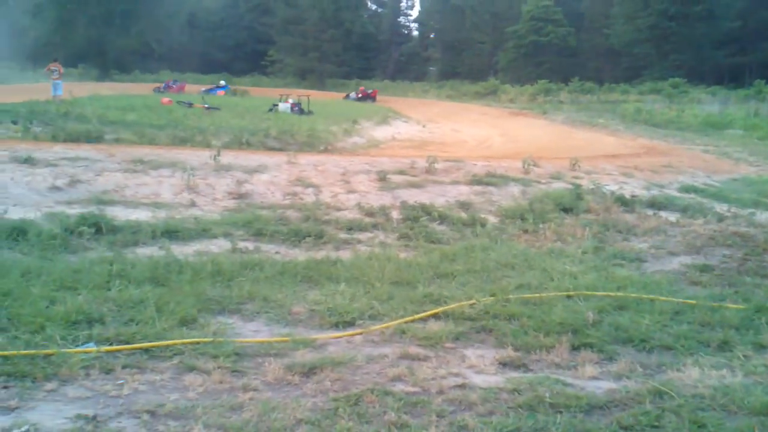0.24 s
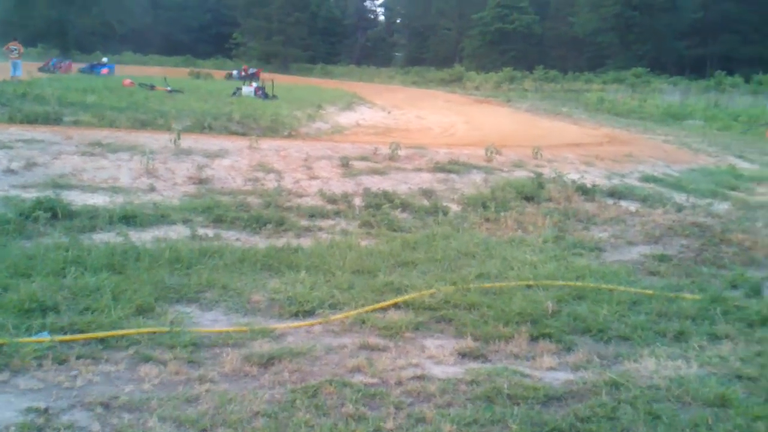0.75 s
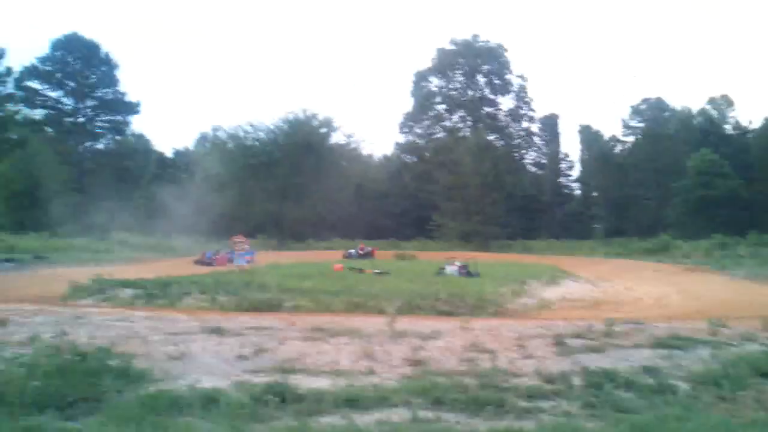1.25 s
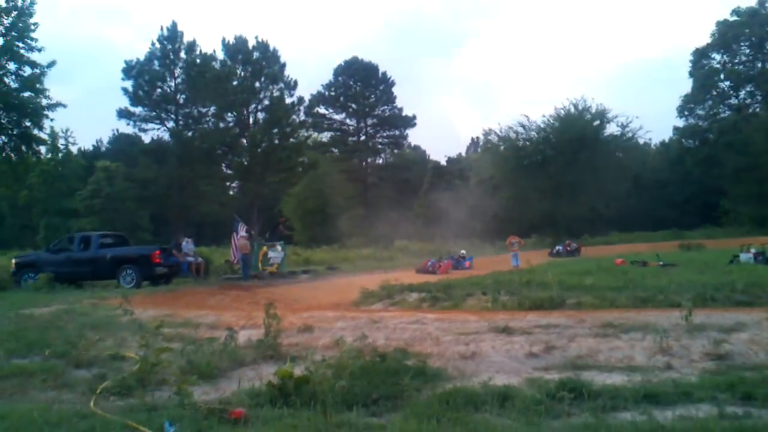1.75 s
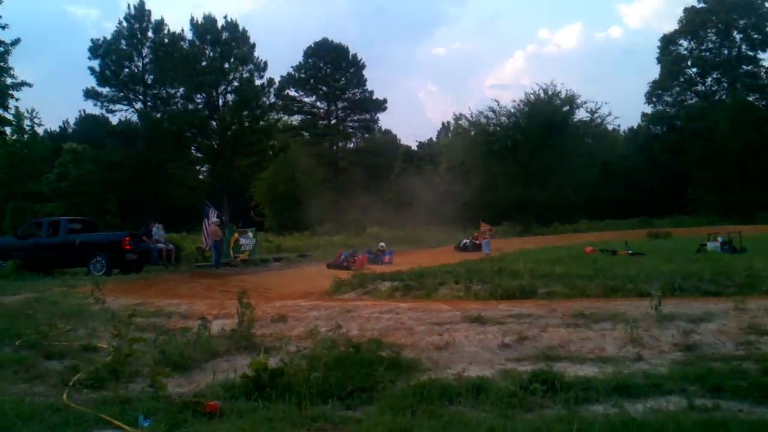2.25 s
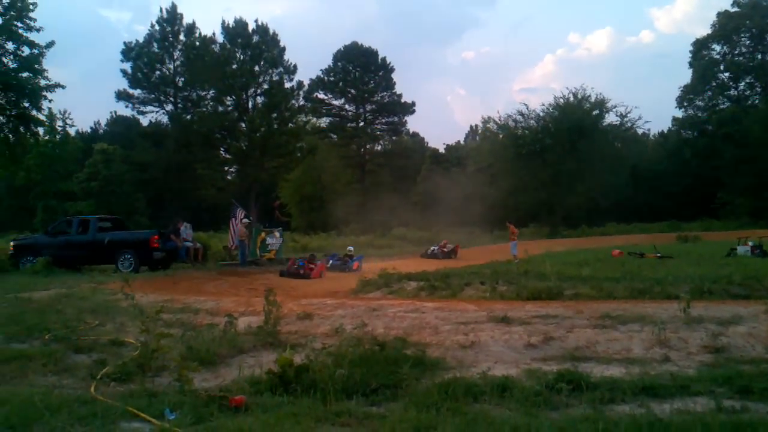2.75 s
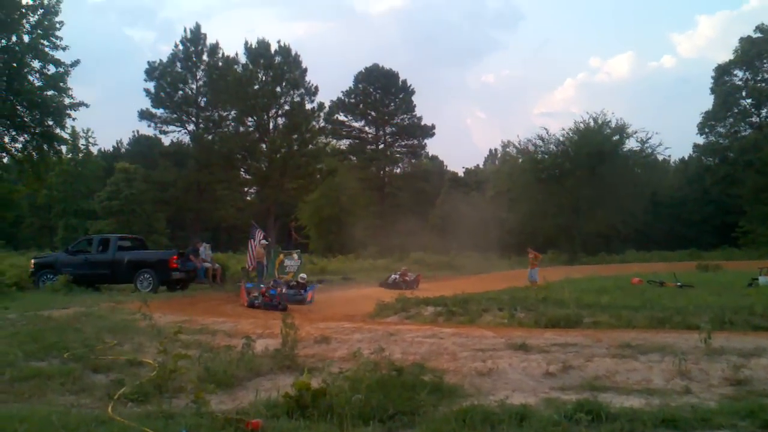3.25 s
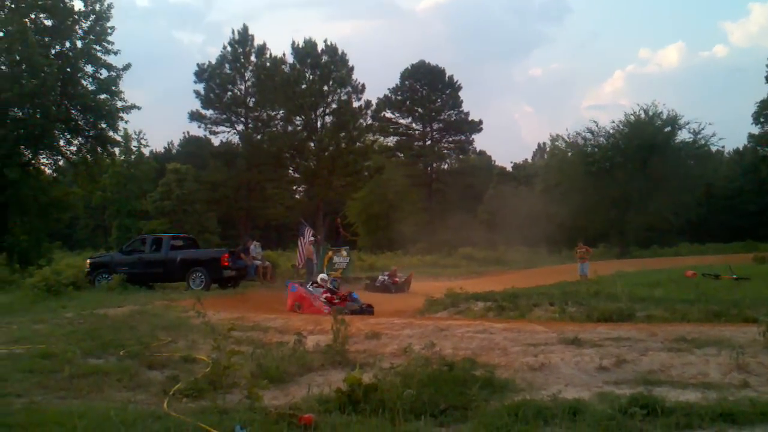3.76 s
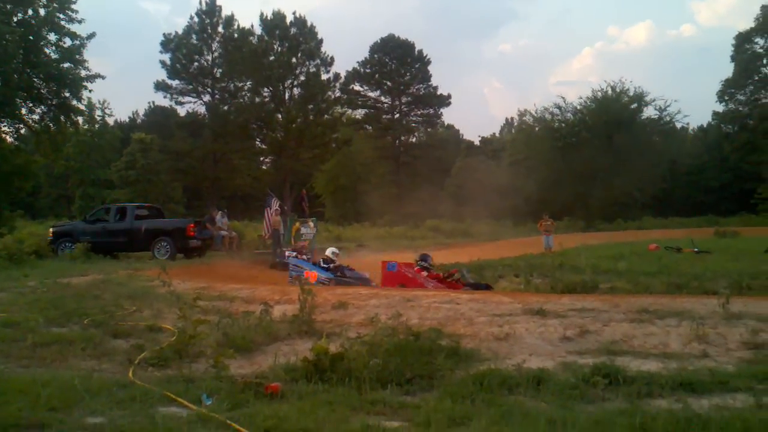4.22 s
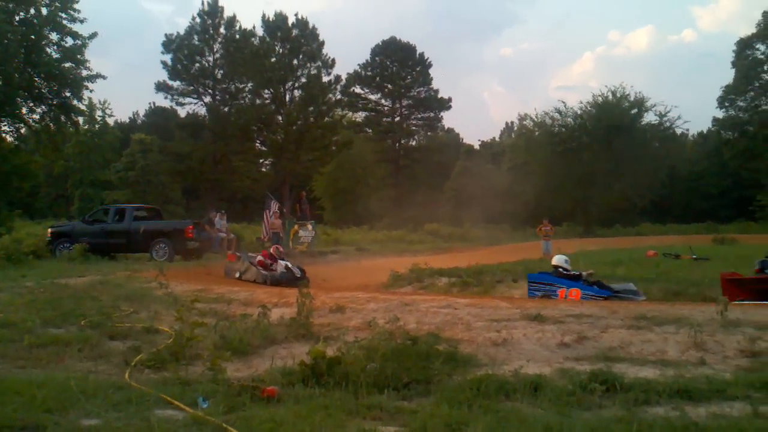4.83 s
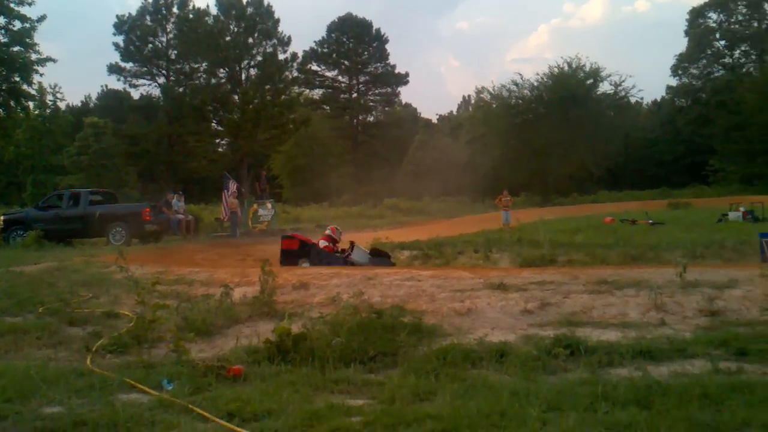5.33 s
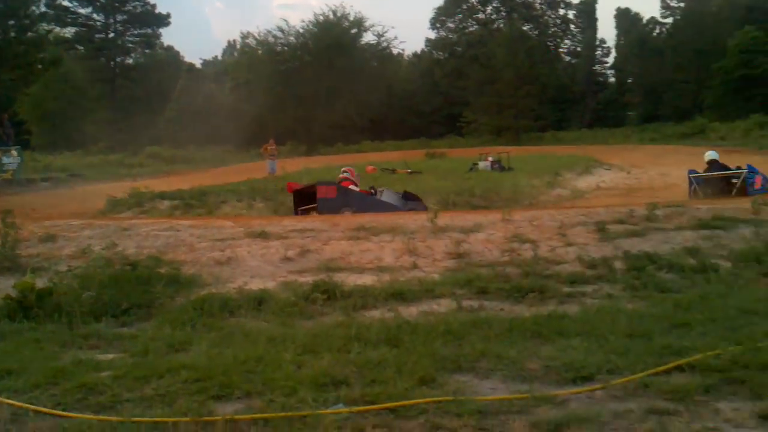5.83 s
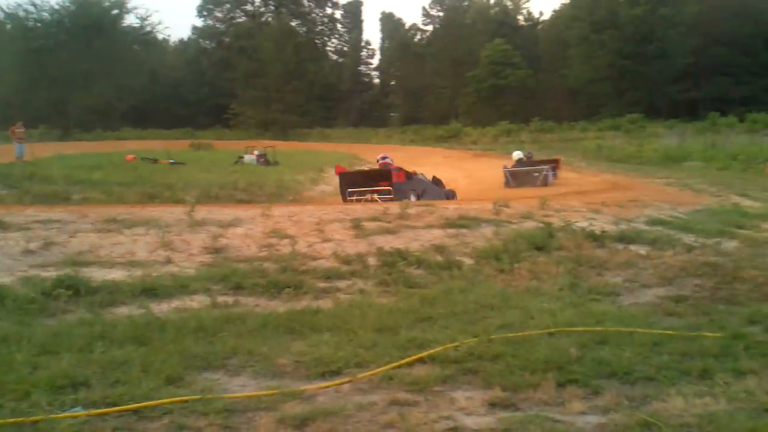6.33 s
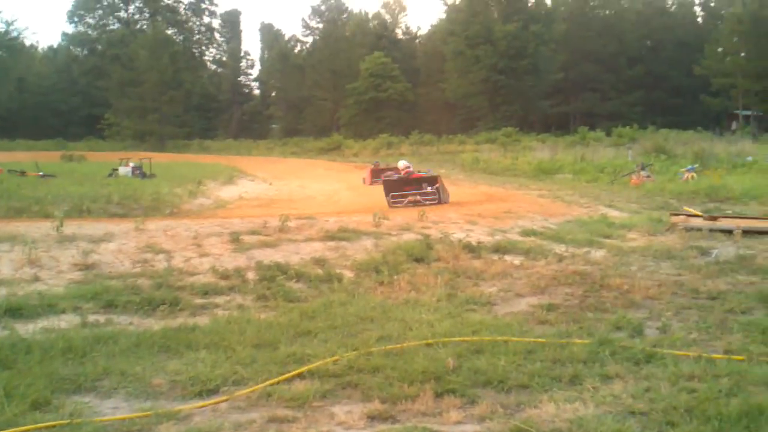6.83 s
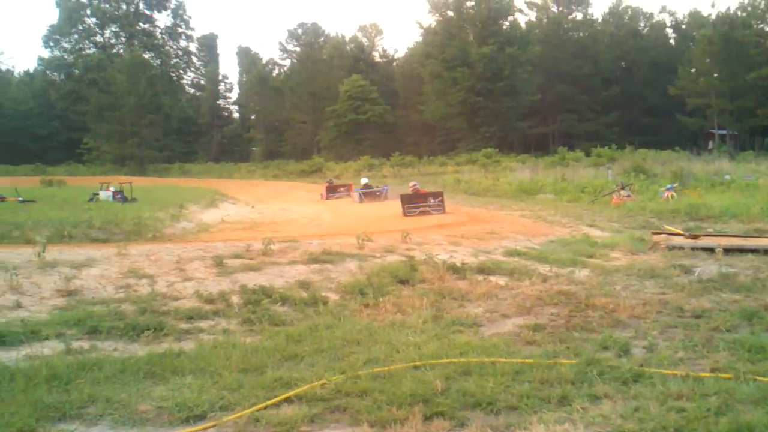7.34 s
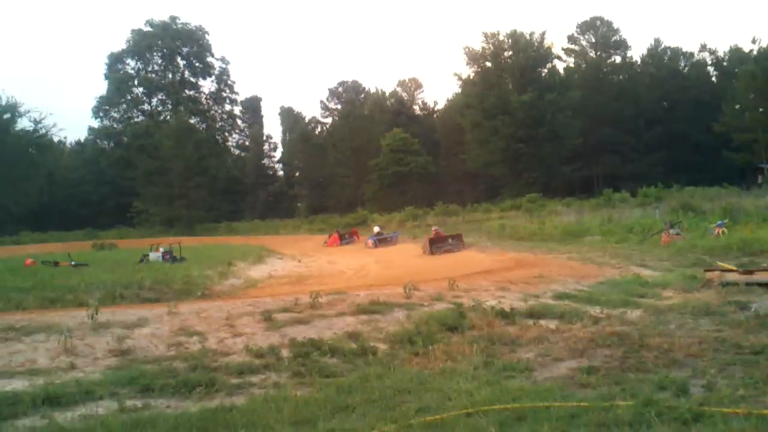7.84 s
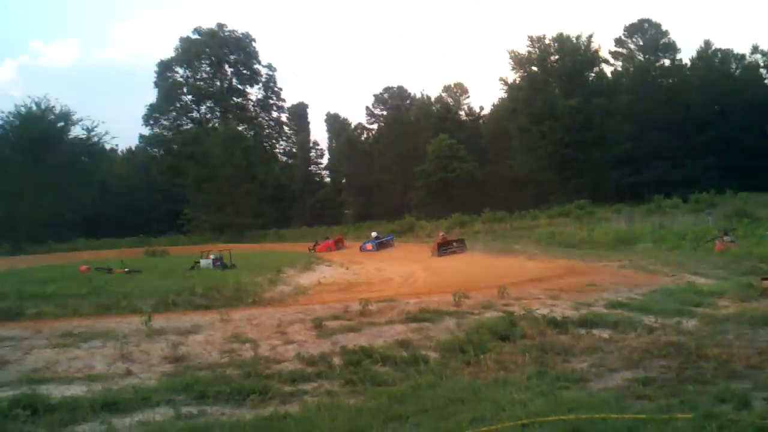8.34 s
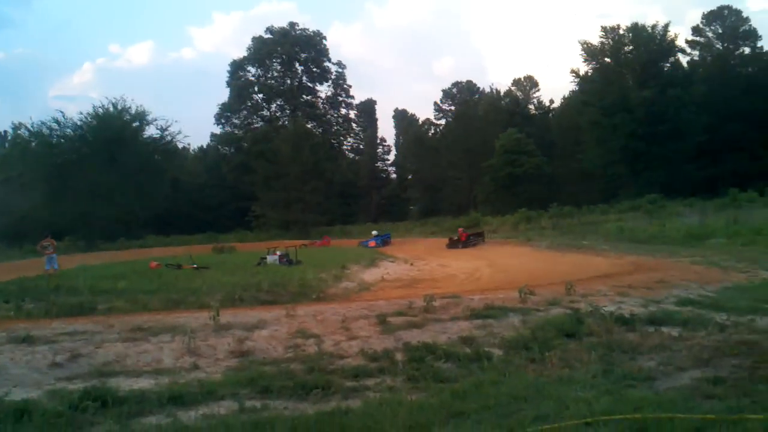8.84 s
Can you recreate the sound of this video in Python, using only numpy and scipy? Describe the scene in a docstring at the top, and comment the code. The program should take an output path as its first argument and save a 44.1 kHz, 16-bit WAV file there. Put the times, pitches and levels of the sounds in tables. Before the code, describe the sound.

Raspy four-stroke karts race by outdoors on packed dirt, low muffled growl and crackling exhaust over hissing tyres, passing close and then receding.

```python
"""Go-karts on a dirt track

Three small four-stroke go-karts lap a dirt track, sweep past a camera and run off into the far turn.
Each firing is a low boom and a bark, with a sharp crack of gas when the pipe points at the camera.
Boom, bark and intake growl are shaped clicks, one per firing; cracks and bangs are short bursts of noise.
Tyres hiss as patchy noise, trees answer with a fading echo, and the camera widens the stereo image."""
import sys
import numpy as np
from scipy import signal
from scipy.fft import rfft, irfft, next_fast_len
from scipy.io import wavfile
from scipy.ndimage import uniform_filter1d, map_coordinates

SR = 44100
rng = np.random.default_rng(int(sys.argv[2]) if len(sys.argv) > 2 else 0)


def store_pcm(level_fs):
    """Save levels as 16-bit WAV."""
    pcm = np.round(np.clip(level_fs, -1, 1) * 32767).astype(np.int16)
    wavfile.write(sys.argv[1], SR, np.atleast_2d(pcm).T)


N = 400428

# All levels are relative: the functions below add trims. Tables with time_s are joined by straight lines.
# Firing rate of each engine, up on the straights and down into the turns: time_s, firings_per_s
FAST_RATE = [(0.0, 46.61), (0.93, 44.12), (1.22, 45.18), (1.69, 43.53), (2.19, 47.53), (3.27, 52.41),
             (4.25, 47.06), (4.79, 45.42), (5.0, 43.8), (5.24, 43.97), (5.6, 42.59), (5.99, 41.7),
             (6.29, 40.34), (6.96, 44.57), (7.79, 48.25), (8.37, 48.9), (9.08, 45.18)]
MIDDLE_RATE = [(0.0, 44.07), (1.06, 37.88), (1.55, 36.63), (3.36, 44.99), (3.75, 44.92), (4.5, 41.66),
               (4.8, 42.48), (5.3, 40.64), (5.75, 37), (6.0, 35.6), (6.24, 34.5), (6.69, 35.75),
               (7.25, 35.3), (7.49, 37.2), (8.25, 41.53), (8.5, 41.87), (8.75, 43.83), (9.08, 44.16)]
SLOW_RATE = [(0, 28.29), (.85, 27.61), (1.1, 28.61), (1.35, 30), (1.75, 29.2), (2.3, 32.6), (2.9, 35.6),
             (3.35, 36.9), (3.7, 33.21), (4, 31.02), (4.4, 30.79), (4.8, 29.73), (5.5, 27.79),
             (5.95, 25.99), (6.55, 26.11), (7, 28.41), (7.5, 30.95), (8.1, 33.97), (8.45, 35), (9.08, 34.6)]
# Exhaust loudness as each kart nears and turns its pipe: time_s, boom_db, bark_db
FAST_LEVEL = [(0, -54, -68), (.8, -51, -54), (1.6, -48, -44), (2.4, -36, -45), (3.15, -44, -31),
              (3.65, -39.5, -37.5), (4.15, -32, -36), (4.52, -27.5, -26.5), (4.72, -33.5, -34),
              (5.05, -33, -30.5), (5.4, -35.5, -30.5), (6, -34.5, -29.5), (6.7, -43.5, -36),
              (7.6, -49, -31.5), (8.45, -38.5, -38), (9.08, -50, -49)]
MIDDLE_LEVEL = [(0, -41, -41), (.42, -49, -47), (.62, -58, -62), (1.5, -45, -58), (2.4, -40, -53),
                (3, -37, -40), (3.7, -60, -51), (4.5, -46, -41), (5.05, -60, -57), (5.9, -36, -36),
                (6.5, -33, -30.5), (7.1, -37.5, -27.5), (7.55, -35.5, -27), (7.95, -33.5, -30.5),
                (8.3, -35.5, -31.5), (8.67, -34.5, -28), (9.08, -34.5, -36.5)]
# The slow kart's exhaust loudness: time_s, boom_db
SLOW_LEVEL = [(0, -48), (.55, -42), (1.5, -40.5), (2.4, -36.5), (3.1, -27.5), (3.42, -33), (3.65, -42.5),
              (4.4, -32.5), (5.05, -45.5), (5.6, -39.5), (6.3, -41), (8.3, -43), (9.08, -49)]
# Tone colours of the three mufflers, the bark and the gas jet: pitch_hz, level_db
FAST_MUFFLER = [(50, -31.5), (95, -23), (140, -11), (190, -9), (280, 0.9), (355, -6), (420, 0), (510, -8.5),
                (610, -8.5), (800, -14.5), (1300, -34.5)]
MIDDLE_MUFFLER = [(50, -38), (100, -30), (140, -8), (215, 1), (270, -1.5), (320, 2.5), (400, 2),
                  (500, -1.5), (600, -10), (1300, -25.5)]
SLOW_MUFFLER = [(50, -55), (100, -14), (140, -0.5), (210, 7), (270, -5.5), (335, 3), (430, -12.5),
                (640, -15), (800, -18), (1300, -40.5)]
BARK_COLOUR = [(150, -13.5), (450, -2), (680, 1), (880, -1), (1170, -8.5), (1450, -2.5), (1900, -8.5),
               (2500, -20.5), (4000, -26.5), (9000, -51)]
JET_COLOUR = [(1200, -9), (2500, -0.5), (3500, 3.5), (5200, 1.5), (6600, 15), (7900, 11.5), (9300, 17.5),
              (10600, 4.5), (11900, 13.5), (12900, 13.5), (13800, 12.5)]
# Times when a pipe points at the camera: kart, start_s, length_s, level_db, dullness (0 near to 1 far)
CRACKS = [("middle", 0, 0.12, -35.5, 0.59), ("middle", 0.24, 0.21, -38.5, 0.72),
          ("fast", 3.444, 0.13, -26, 0), ("fast", 3.68, 0.098, -30, 0.09), ("fast", 4.58, 0.1, -21.5, 0),
          ("fast", 4.82, .1, -25.5, 0.15), ("fast", 4.935, 0.2, -19.5, 0.084),
          ("fast", 5.84, 0.095, -20, 0.045), ("fast", 6.125, 0.046, -17.5, 0.16),
          ("middle", 6.43, 0.46, -30, 0.15), ("middle", 6.945, 0.17, -28, 0.15),
          ("middle", 7.17, 0.081, -30, .2), ("fast", 7.82, 0.21, -25.5, 0.53)]
CRACK_RISE_DB_PER_S, CRACK_FALL_DB_PER_S = 94, 93
CRACK_UNDER_BARK_DB = -14  # the faint crack left when the pipe points away
FAR_HZ = 4430  # distance dulls the crack above this
JET_PEAK_HZ, JET_STRAY_OCTAVES = 8330, 0.46  # brightest band of the cracks, and how far each one strays
# Echoes off the ground and the nearest bank: delay_s, level_db
BANKS = [(.0035, -8.5), (.008, -12)]
BANK_DRIFT_S = .0007  # typical wander of these delays as a kart moves
# Wash of all karts together: time_s, roar_db, dirt_db
WASH_LEVEL = [(0, -38, -40.5), (.7, -47, -40), (1.4, -41, -41), (2.4, -32, -36.5), (3.1, -25.5, -30),
              (3.38, -27, -30), (3.62, -33.5, -36), (4.1, -30.5, -34.5), (4.45, -30.5, -32.5),
              (5, -34, -32.5), (5.4, -33.5, -34), (6.03, -33, -30.5), (6.45, -40, -38.5), (7.1, -41, -38),
              (7.4, -39, -36), (7.85, -33, -32), (8.45, -31.5, -33.5), (9.08, -37, -35)]
# Tone colours of the engine drone, engine roar, dirt and dust: pitch_hz, level_db
DRONE_COLOUR = [(25, -43), (55, -34), (100, -9.5), (190, -0.5), (320, -0.5), (480, -9.5), (900, -31.5)]
ROAR_COLOUR = [(300, -25.5), (520, 3.5), (700, 0.5), (950, -2.5), (1170, -7), (1450, -9), (2000, -9),
               (2600, -23), (4500, -45)]
DIRT_COLOUR = [(1500, -10), (2200, 1), (2600, -11), (3100, 2), (3600, -2.5), (5200, -2.5), (6500, -3),
               (8200, 2.5), (9500, -1.5), (11000, -4.5), (14000, -10)]
DUST_COLOUR = [(8000, -15), (10300, 4.5), (11800, -4), (13700, 2.5)]
DRONE_DB, DRONE_FOLLOWS = -34.5, 0.7  # mean level; swing in dB per dB of the slow kart's boom
# Finest hiss, strongest as karts throw dust toward the camera: time_s, level_db
DUST_LEVEL = [(0, -44), (.9, -44), (1.13, -41), (1.45, -52), (2.75, -40), (3.4, -29), (3.9, -40),
              (4.3, -36), (4.6, -29), (5.05, -32), (5.45, -37), (6.05, -27), (6.4, -39), (7.3, -40),
              (7.6, -32), (8, -29.5), (8.3, -33), (8.7, -35), (9.08, -39)]
# Short showers of dirt flung up by tyres: time_s, extra_level_db (0 adds nothing)
SHOWERS = [(1.13, 0.5), (3.43, 0), (6.04, 0), (8.35, 4)]
SHOWER_S = 0.029  # how long a shower takes to swell and to sink
# Emphasised bands, shifting as karts turn and change distance; the first two shape everything: time_s, pitch_hz
BOOM_PEAK = [(0, 280), (.9, 230), (2.2, 278), (3.1, 342), (3.5, 310), (4, 283), (4.6, 267), (5.3, 213),
             (6.7, 210), (7.6, 229.9), (8.6, 310), (9.08, 260)]
BARK_PEAK = [(0, 730), (2.5, 660), (3.1, 720), (3.5, 784), (3.8, 620), (4.2, 750), (4.65, 700), (4.9, 830),
             (6.4, 700), (7.3, 810), (7.8, 860), (8.45, 780), (8.65, 942), (9.08, 880)]
DIRT_PEAK = [(0, 9200), (1.8, 8400), (3.3, 8600), (4.3, 8600), (5.1, 6940), (6, 7900), (7.6, 9500),
             (8.25, 9700), (8.45, 7800), (9.08, 8500)]
# How long the echo from the trees takes to fade by 60 dB: pitch_hz, fade_s
TREE_FADE = [(150, 0.55), (1000, 0.13), (4000, 0.27), (12000, 0.034)]
# Single firings that bang much harder than their neighbours: time_s, level_db
BANGS = [(0.018, -29), (0.042, -26), (0.247, -27), (0.3658, -27), (0.511, -26), (.608, -31), (3.564, -28),
         (4.6495, -19), (4.8215, -17), (4.8668, -15.5), (4.979, -19), (5.071, -20), (5.095, -22),
         (5.162, -14), (5.2317, -17.5), (5.2528, -20), (5.321, -22), (5.859, -24), (5.979, -25),
         (6.1235, -16), (6.1726, -14), (6.379, -20), (6.493, -22), (6.5207, -24), (6.577, -24),
         (6.633, -20), (6.661, -19), (6.690, -20), (6.775, -19), (6.886, -21), (6.9705, -20), (7.027, -19),
         (7.055, -20), (7.083, -15.5), (7.1125, -22), (7.583, -19), (8.0442, -15), (8.109, -19),
         (8.3112, -15.5), (8.782, -21)]
# Tone colour of a bang: pitch_hz, level_db
BANG_COLOUR = [(400, -1), (900, 7), (1600, -2.5), (3500, -1.5), (5200, 1), (6800, 6.5), (9300, 15),
               (11000, 6.5), (13800, 6)]
BANG_S = 0.002  # time for a bang's puff to fall to about a third
# Air intakes of the fast and slow karts as they face the camera: time_s, level_db
INTAKE_LEVEL = [(1.2, -58), (2.3, -42), (2.85, -35.5), (3.3, -37), (3.55, -50), (3.85, -41.5), (4.15, -50),
                (4.55, -38.5), (4.9, -52)]
# The middle kart's intake, heard at the start and again in the far turn: time_s, level_db
LAST_INTAKE_LEVEL = [(0, -37), (.15, -40.5), (.42, -45.5), (.65, -63), (7.2, -53), (7.7, -38.5),
                     (8.45, -38), (9.08, -50)]
# Tone colour of the intake growl: pitch_hz, level_db
INTAKE_COLOUR = [(430, -14.5), (560, -1), (680, -1), (820, -2.5), (1050, -11.5), (1500, -18)]
# Tyres scrubbing over packed dirt in the turn: middle_s, half_length_s, level_db
SCRUBS = [(3.105, 0.034, -27.5), (4.466, 0.065, -31.5)]
# Tone colour of the scrubs: pitch_hz, level_db
SCRUB_COLOUR = [(1000, -15), (1500, -2), (2200, -2), (3000, -13)]
# Where the field leans, first left and later slightly right: time_s, left_minus_right_db
PAN = [(0, 0), (1.1, 0.5), (3.3, 1.4), (4.3, 2), (4.8, -0.6), (9.08, -0.7)]
# Difference signal between the two microphone ports: pitch_hz, side_db
SPREAD = [(100, -12), (300, -6), (700, -8), (1150, -5.5), (1600, 2.5), (3300, 0), (14000, 0)]
# Final tilt between the two channels: pitch_hz, left_minus_right_db
BALANCE = [(60, 3), (250, 5), (430, 5), (650, 0), (1100, -1), (1600, -2), (2200, 0), (3200, 0),
           (14000, -.5)]
# Stereo widener, share of the delayed opposite channel taken away: pitch_hz, share (0 to 1)
CROSSFEED = [(250, .02), (500, .3), (900, .9), (1300, 1), (3000, 1), (3900, .92), (5200, .52), (7000, .25),
             (13000, .27)]
CROSS_DELAY_S = 1 / 2610
CLIP_TOP = .92  # peaks bend smoothly toward this sample value
TOP_HZ = 14000  # nothing passes above this


def amp(db):
    """Turn decibels into a plain multiplier."""
    return 10 ** (np.asarray(db) / 20)


def unit(x):
    """Scale a sound to an average strength (rms) of 1."""
    return x / np.sqrt(np.mean(x ** 2) + 1e-20)


def along(points, hz):
    """Read a table of pitch and value at any pitch, on a log pitch axis."""
    table_hz, value = np.transpose(points)
    return np.interp(np.log(hz + 1), np.log(table_hz + 1), value)


def curves(rows):
    """Turn each column after the time into one value per sample."""
    time_s, *columns = np.transpose(rows)
    return [np.interp(np.arange(N) / SR, time_s, column) for column in columns]


def wobble(rate):
    """Make a smooth random curve with this many random knots a second."""
    steps = np.linspace(0, N * rate / SR, N // 100)
    knots = rng.standard_normal(int(N * rate / SR) + 4)
    coarse = map_coordinates(knots, [steps])
    return np.interp(np.arange(N) * rate / SR, steps, coarse)


def filtered(x, response):
    """Change the strength and timing of each pitch by a given response."""
    size = 2 * next_fast_len(N // 2 + SR // 8, True)
    hz = np.fft.rfftfreq(size, 1 / SR)
    return irfft(rfft(x, size) * response(hz), size)[..., :N]


def coloured(x, points):
    """Give a sound a tone colour with a filter that rings only after each input, then scale to rms 1."""
    size = 4096
    hz = np.fft.rfftfreq(size, 1 / SR) + 1
    octaves_below = np.log2(points[0][0] / hz)
    octaves_above = np.log2(hz / points[-1][0])
    outside = np.maximum(0, np.maximum(octaves_below, octaves_above))
    # Beyond the table the level falls; folding the cepstrum makes the filter minimum phase
    cepstrum = irfft(np.log(amp(along(points, hz) - 12 * outside)))
    cepstrum[1:size // 2] *= 2
    cepstrum[size // 2 + 1:] = 0
    ring = irfft(np.exp(rfft(cepstrum)))
    return unit(signal.oaconvolve(np.atleast_2d(x), ring[None], axes=1)[:, :N])


def resonant(x, peak_rows, contrast_db, octaves):
    """Raise a moving band by half the contrast and lower the far pitches by the other half."""
    hz, t, z = signal.stft(x, SR, nperseg=1024)
    peak_hz = np.interp(t, *np.transpose(peak_rows))
    away = np.log2((hz[:, None] + 1) / peak_hz) / octaves
    gain = amp(contrast_db * (np.exp(-away ** 2) - .5))
    return signal.istft(z * gain, SR, nperseg=1024)[1][:, :N]


def noise():
    """White noise, unrelated at the two ports."""
    return rng.standard_normal((2, N))


def firings(rate_rows, first_s, jitter_s, wander_s):
    """Find the samples where an engine fires; bumps make it run a little ahead or behind."""
    rate, = curves(rate_rows)
    count = np.cumsum(rate) / SR - first_s * rate[0] + wander_s * rate * wobble(6)
    at = np.interp(np.arange(int(count[-1]) + 1), count, np.arange(N))
    at = at + jitter_s * SR * rng.standard_normal(len(at))
    return np.clip(at, 0, N - 1).astype(int)


def pulses(at, scatter_db):
    """One click per firing, each with its own random strength."""
    strength = amp(scatter_db * rng.standard_normal(len(at)))
    return np.bincount(at, strength, N)


def puffs(train, fade_s):
    """A short rush of turbulent gas: noise that breaks out abruptly at each click and dies away."""
    t = np.arange(SR // 40) / SR
    return signal.oaconvolve(train, np.exp(-t / fade_s))[:N] * noise()


def with_banks(at, scatter_db):
    """Firings and near echoes; as the paths drift, each overtone swells and fades in turn."""
    train = pulses(at, scatter_db)
    for delay_s, db in BANKS:
        late = at + SR * (delay_s + BANK_DRIFT_S * wobble(2.5)[at])
        late = late[(late >= 0) & (late < N)].astype(int)
        train = train + amp(db) * pulses(late, scatter_db)
    return train


def boom(at, muffler, level_db):
    """Each firing rings the muffler; the level wavers as the kart bounces."""
    ringing = coloured(with_banks(at, scatter_db=1.0), muffler)
    return -amp(level_db + 1.24 * wobble(9)) * ringing


def bark(at, level_db, rough, fade_s):
    """The sharp front of each exhaust pulse, followed by ragged gas."""
    train = pulses(at, scatter_db=1.0)
    rough = np.clip(rough, 0, 1)  # gas share of the power
    front = -coloured(train, BARK_COLOUR)
    gas = coloured(puffs(train, fade_s), BARK_COLOUR)
    return amp(level_db) * (np.sqrt(1 - rough) * front + np.sqrt(rough) * gas)


def crack(at, kart, bark_db, trim_db):
    """Bright gas leaving the pipe: faint under the bark, it rises, holds and falls in each spell."""
    t = np.arange(N) / SR
    level_db = bark_db + CRACK_UNDER_BARK_DB
    dullness = np.zeros(N)
    for name, start, length, db, dull in CRACKS:
        if name == kart:
            before_db = CRACK_RISE_DB_PER_S * (start - t)
            after_db = CRACK_FALL_DB_PER_S * (t - start - length)
            spell_db = db - np.maximum(np.maximum(before_db, after_db), 0)
            dullness[spell_db > level_db] = np.clip(dull, 0, 1)
            level_db = np.maximum(level_db, spell_db)
    near = coloured(puffs(pulses(at, scatter_db=1.1), fade_s=.0029), JET_COLOUR)
    # Each firing gets its own brightest band
    peak_hz = JET_PEAK_HZ * 2 ** (JET_STRAY_OCTAVES * rng.standard_normal(len(at)))
    near = unit(resonant(near, np.column_stack([at / SR, peak_hz]), contrast_db=5, octaves=.35))
    far = unit(signal.lfilter(*signal.butter(4, FAR_HZ, fs=SR), near))
    return amp(level_db + trim_db) * (np.sqrt(1 - dullness) * near + np.sqrt(dullness) * far)


def fast_kart(at):
    """The highest-revving kart: muffler boom, rough bark and cracks of gas."""
    boom_db, bark_db = curves(FAST_LEVEL)
    pops = bark(at, bark_db - 3.5, rough=.42, fade_s=.0045)
    return boom(at, FAST_MUFFLER, boom_db + .5) + pops + crack(at, "fast", bark_db, trim_db=-4.5)


def middle_kart(at):
    """The last kart to pass drives away with its pipe facing the camera: boom, bark and cracks."""
    boom_db, bark_db = curves(MIDDLE_LEVEL)
    pops = bark(at, bark_db - 3.8, rough=.3, fade_s=.0042)
    return boom(at, MIDDLE_MUFFLER, boom_db + .5) + pops + crack(at, "middle", bark_db, trim_db=1.5)


def slow_kart(at):
    """A well-muffled, low-revving kart with only a soft bark."""
    boom_db, = curves(SLOW_LEVEL)
    soft_bark = bark(at, boom_db - 12, rough=0.25, fade_s=0.0081)
    return boom(at, SLOW_MUFFLER, boom_db - .7) + soft_bark


def bounces(at, reach_s, doppler, count):
    """Copies of the firings off ground and banks; each path slowly changes length, so they beat."""
    delay_s = rng.uniform(0, reach_s, (count, 1))
    stretch = rng.normal(0, doppler, (count, 1))
    arrivals = (at + delay_s * SR + stretch * (at - N / 2)).astype(int)
    return pulses(arrivals[(arrivals >= 0) & (arrivals < N)], scatter_db=1.5)


def spray(patchy_db, grain_db):
    """Noise of flying dirt: it comes in small clumps, and each band flares up and sinks by itself."""
    z = signal.stft(noise() * amp(grain_db * wobble(190)), nperseg=256)[2]
    field = rng.standard_normal(z.shape[1:])
    field = uniform_filter1d(field, size=9, axis=0)  # smooth over pitch
    field = uniform_filter1d(field, size=16, axis=1)  # smooth over time
    return signal.istft(z * amp(patchy_db * unit(field)), nperseg=256)[1][:, :N]


def follow(level_db, mean_db, slope):
    """A level that swings about its own mean, slope dB for each dB of another."""
    return mean_db + slope * (level_db - level_db.mean())


def showers():
    """Extra hiss in dB while a tyre flings dirt."""
    t = np.arange(N) / SR
    return sum(db * np.exp(-((t - s) / SHOWER_S) ** 2) for s, db in SHOWERS)


def wash(engines):
    """Firings scattered over the field make a drone, a roar and a rasp; tyres throw dirt and dust."""
    roar_db, dirt_db = curves(WASH_LEVEL)
    dirt_db = dirt_db + showers()
    boom_db, = curves(SLOW_LEVEL)
    ports = [sum(bounces(at, reach_s=.06, doppler=.004, count=5) for at in engines) for _ in range(2)]
    scattered = unit(np.array(ports))
    drone_db = follow(boom_db, DRONE_DB, DRONE_FOLLOWS)
    drone = amp(drone_db) * coloured(scattered + .5 * noise(), DRONE_COLOUR)
    roar = amp(roar_db - 4.5) * coloured(scattered + .5 * noise(), ROAR_COLOUR)
    all_firings = sum(pulses(at, scatter_db=1.5) for at in engines)
    rasp = amp(dirt_db - 5.5) * coloured(puffs(all_firings, fade_s=0.0061), DIRT_COLOUR)
    dirt = amp(dirt_db + 3.0) * coloured(spray(patchy_db=2.5, grain_db=1.0), DIRT_COLOUR)
    dust_db, = curves(DUST_LEVEL)
    dust = amp(dust_db) * coloured(spray(patchy_db=3.0, grain_db=1.0), DUST_COLOUR)
    return drone + roar + dust + resonant(dirt + rasp, DIRT_PEAK, contrast_db=3.0, octaves=0.28)


def intakes(engines, level_rows):
    """One hard gulp of air per firing from each engine; with two, the strokes slide past each other."""
    level_db, = curves(level_rows)
    gulps = sum(with_banks(at, scatter_db=1.8) for at in engines)
    return amp(level_db) * coloured(gulps, INTAKE_COLOUR)


def tree_line(x):
    """A diffuse answer from the trees: fading noise smears the sound, each pitch dying at its own pace."""
    hz, t, z = signal.stft(rng.standard_normal((2, SR // 2)), SR, nperseg=256)
    fade = amp(-60 * t / along(TREE_FADE, hz)[:, None])
    tail = signal.istft(z * fade, SR, nperseg=256)[1]
    return signal.oaconvolve(x, tail / np.linalg.norm(tail[0]), axes=1)[:, :N]


def bangs():
    """Now and then one firing spits a much harder, broader crack of gas."""
    time_s, db = np.transpose(BANGS)
    train = np.bincount((time_s * SR).astype(int), amp(db + 4.0), N)
    burst = puffs(train, fade_s=BANG_S)
    return burst.std() * coloured(burst, BANG_COLOUR)


def scrubs():
    """A short gritty rasp of flickering noise as a tyre slides."""
    t = np.arange(N) / SR
    level = sum(amp(db) * np.exp(-((t - s) / half_s) ** 2) for s, half_s, db in SCRUBS)
    return level * coloured(noise() * amp(2.5 * wobble(150)), SCRUB_COLOUR)


def scene():
    """Karts, echo and wash at two close ports that hear the bass almost alike."""
    fast = firings(FAST_RATE, first_s=.0194, jitter_s=.00005, wander_s=.0003)
    middle = firings(MIDDLE_RATE, first_s=.0169, jitter_s=.00006, wander_s=.00016)
    slow = firings(SLOW_RATE, first_s=.01, jitter_s=.00006, wander_s=.001)
    karts = fast_kart(fast) + middle_kart(middle) + slow_kart(slow) + bangs()
    karts = karts + intakes([fast, slow], INTAKE_LEVEL) + intakes([middle], LAST_INTAKE_LEVEL)
    echo = amp(-10.5) * tree_line(karts)
    field = karts + echo + wash([fast, middle, slow]) + scrubs()
    field = resonant(field, BOOM_PEAK, contrast_db=3, octaves=0.19)
    field = resonant(field, BARK_PEAK, contrast_db=4, octaves=0.32)
    pan_db, = curves(PAN)
    left, right = field * amp(2.5 + pan_db * np.array([[.5], [-.5]]))
    mid = (left + right) / 2
    side = filtered((left - right) / 2, lambda hz: amp(along(SPREAD, hz)))
    return np.array([mid + side, mid - side])


def record(dry):
    """The camera takes a delayed share of each channel from the other, rounds peaks, tilts and cuts the top."""
    def opposite(hz):
        share = np.clip(along(CROSSFEED, hz), 0, 1)
        return share * np.exp(-2j * np.pi * hz * CROSS_DELAY_S)

    def tilt_and_cut(hz):
        tilt_db = along(BALANCE, hz) * np.array([[.5], [-.5]])
        return amp(tilt_db) * (hz < TOP_HZ)

    wide = dry - filtered(dry[::-1], opposite)
    wide = wide / (1 + (wide / CLIP_TOP) ** 4) ** .25
    return filtered(wide, tilt_and_cut)


dry = scene()
out = record(dry)
store_pcm(out)
```